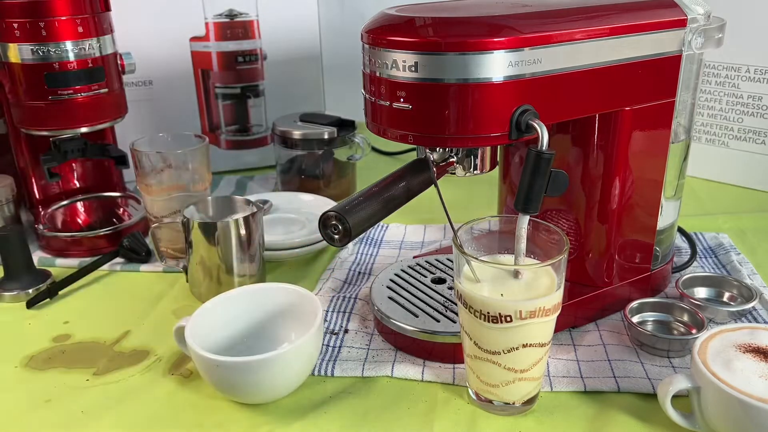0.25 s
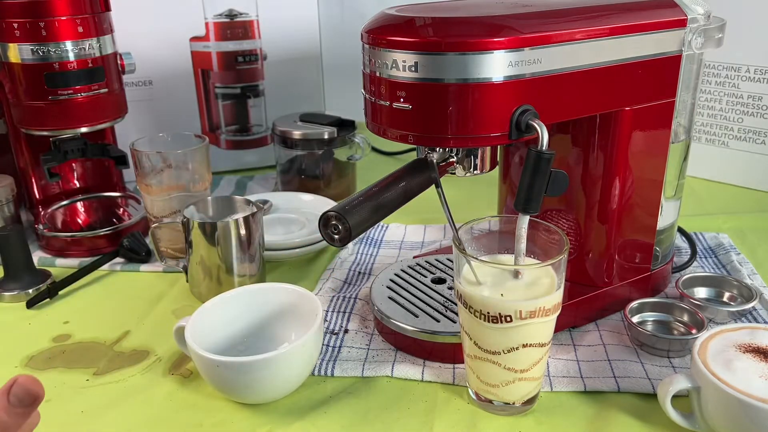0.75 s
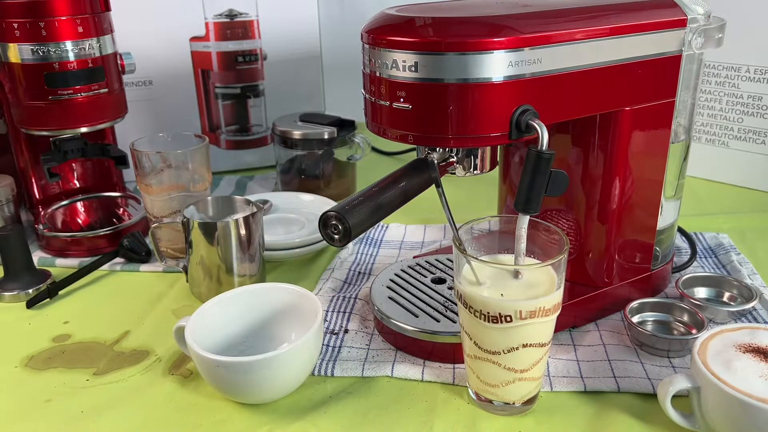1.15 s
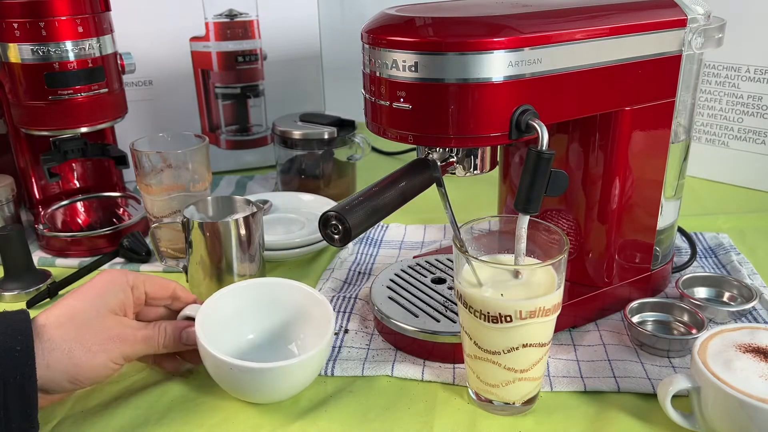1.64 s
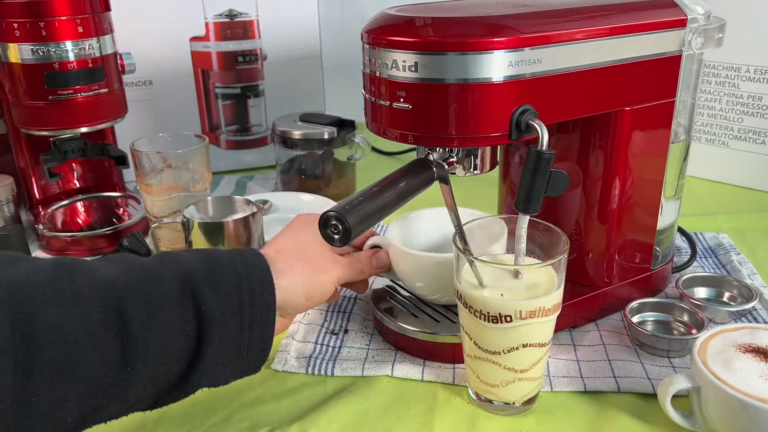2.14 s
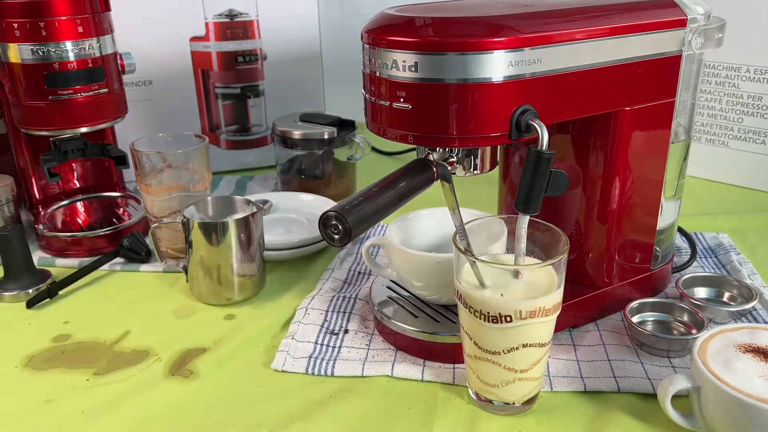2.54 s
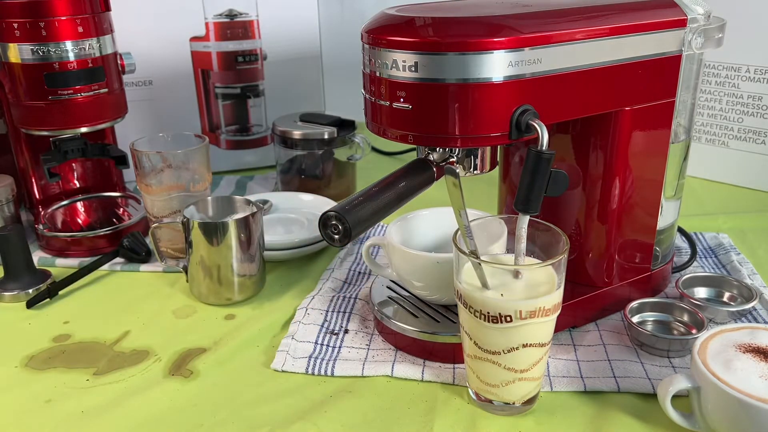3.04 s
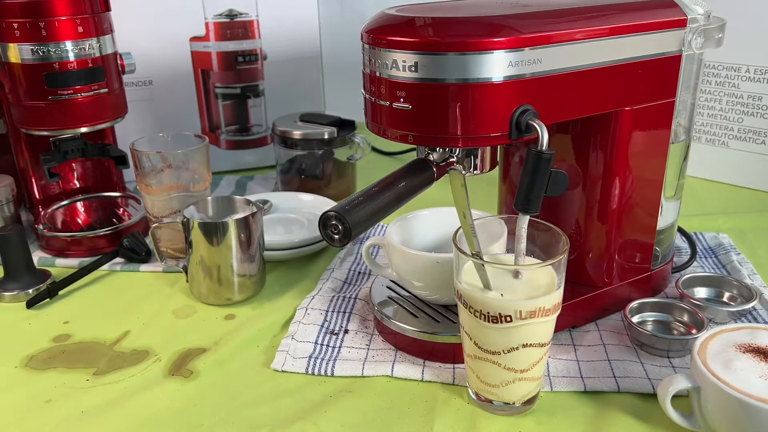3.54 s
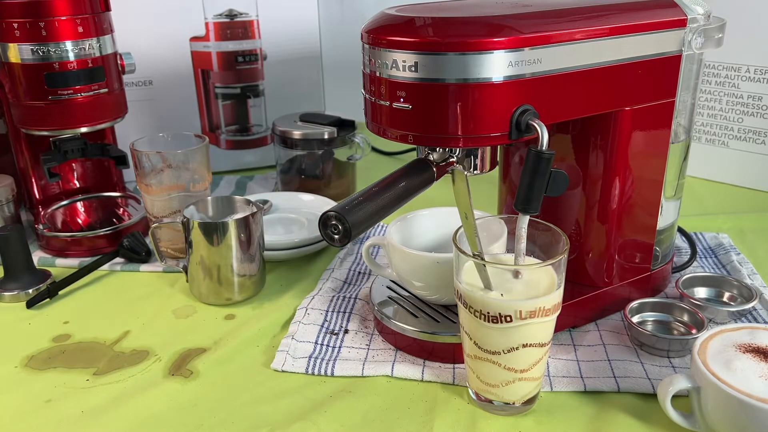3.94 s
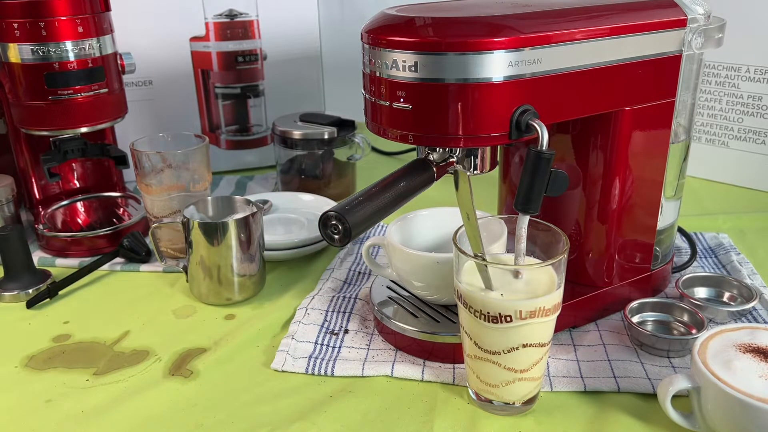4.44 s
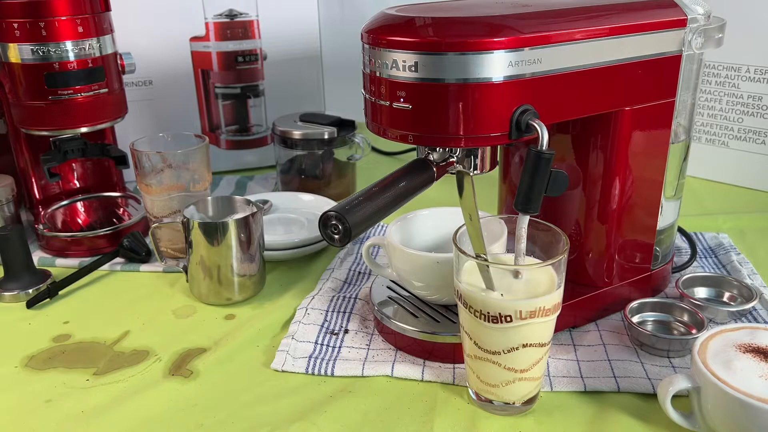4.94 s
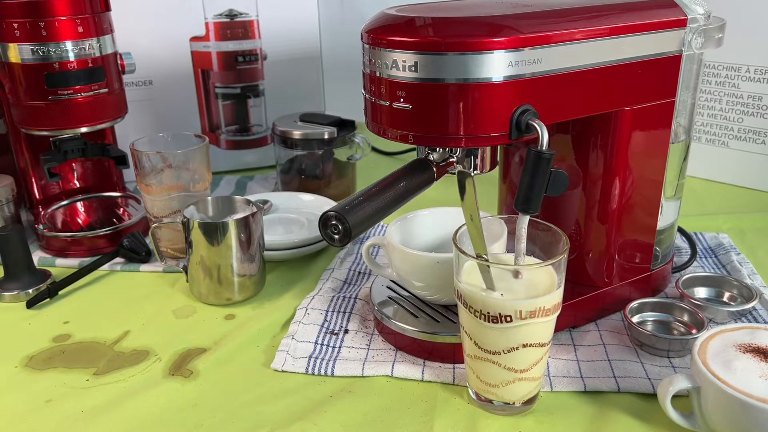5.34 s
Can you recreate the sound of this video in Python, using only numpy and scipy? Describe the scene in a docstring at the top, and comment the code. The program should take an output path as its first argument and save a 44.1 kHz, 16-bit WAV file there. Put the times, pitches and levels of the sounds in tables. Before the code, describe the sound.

From 0 to about 5.5 seconds a steam wand blows into a glass of milk, close up, in loud unbroken hiss. It is not plain white noise: narrow resonances around 2 to 4 kHz give it a piercing, glassy, whistling ring, with softer airy fizz above and faint churning rumble below. As foam rises, most of the resonances slide down by a few percent and the balance shifts gradually; the level grows by only a decibel or two, with slight fluttering. The fizz builds over the first second or so, then dulls. Around 2.1 seconds the hiss turns briefly brighter and a little softer for under half a second. Throughout, a small pump thumps about 4.4 times a second, nearly even, with short woody, low-mid knocks and a faint rattle, slightly left. Short kitchen echoes surround everything; the sound ends still running.

```python
"""Steam hisses and rings in a tall glass of milk on a kitchen counter, close to a stereo microphone.
The jet is noise shaped by resonances of the glass, the foam and the air above it; most sink as foam rises.
A small pump thumps in the machine's housing, timed by the mains, long and short gaps in turn: each stroke
rings decaying sines and shakes a noise rattle. Sparse decaying echoes add the room."""
import sys
import numpy as np
from scipy import signal
from scipy.io import wavfile
from scipy.ndimage import uniform_filter1d

SR = 44100
rng = np.random.default_rng(int(sys.argv[2]) if len(sys.argv) > 2 else 0)


def bounce(signal):
    """Save signal as a 16-bit WAV file at the path given by the first command-line argument."""
    frames = np.transpose(np.atleast_2d(signal))
    limited = np.clip(frames, -1, 1)
    pcm = np.round(limited * 32767).astype(np.int16)
    wavfile.write(sys.argv[1], SR, pcm)


N = 246078  # samples
FFT, HOP = 2048, 512  # samples per spectrum and from one to the next


def gain_of(db):
    """Decibels to a factor."""
    return 10 ** (np.asarray(db) / 20)


def evened(x):
    """Scales to rms 1."""
    return x / np.sqrt(np.mean(x ** 2) + 1e-20)


def smoothed(x, first, second, axis=-1, second_axis=-1):
    """Two running means, then rms 1: a slow random drift when fed with noise."""
    once = uniform_filter1d(x, size=first, axis=axis)
    return evened(uniform_filter1d(once, size=second, axis=second_axis))


def read(points, hz):
    """Reads a spectrum on a log-frequency axis."""
    f, value = np.transpose(points)
    return np.interp(np.log(hz + 1), np.log(f + 1), value)


def kitchen(x, t60_s=0.18, low_hz=500):
    """Room echoes: random-sign taps, about one in 20 samples, die away; each ear has its own, with no bass."""
    length = SR // 2
    taps = np.zeros((2, length))
    slots = np.arange(100, length - 20, 20)
    at = slots + rng.integers(0, 20, (2, len(slots)))
    np.put_along_axis(taps, at, rng.choice([-1., 1.], at.shape), axis=1)
    taps *= gain_of(-60 * np.arange(length) / SR / t60_s)
    taps /= np.linalg.norm(taps[0])
    bass_cut = signal.butter(4, low_hz, "high", fs=SR, output="sos")
    taps = signal.sosfilt(bass_cut, taps)
    return signal.fftconvolve(x, taps, axes=1)[:, :N]


def pump(uneven_db=.4):
    """Strokes ring the same housing modes at slightly uneven strength, and shake loose parts as band noise."""
    # Housing and counter under a stroke, before the stereo gain. Each row: frequency in Hz, level in dB,
    # t60 in s, rise time constant in s, first swing up or down (+1 or -1).
    housing_modes = [(85.6, -41, 0.16, 0.017, 1), (124, -64, 0.24, 0.0044, 1), (152, -66, 0.6, .004, -1),
                     (195.7, -33.5, 0.08, 0.0041, -1), (237, -34.5, 0.02, 0.0024, -1),
                     (266.3, -45.5, 0.28, 0.0077, 1), (378.7, -35, 0.067, 0.0041, -1),
                     (458.5, -41.5, 0.086, 0.0075, -1), (644, -35.5, 0.026, 0.0029, -1),
                     (820, -35.5, 0.023, 0.0013, -1), (1040, -42.5, 0.061, 0.0021, 1),
                     (1470, -39.5, 0.045, 0.0022, -1)]
    first_stroke_s, mains_hz = -0.016, 49.97
    gap_cycles = (11.5, 11)  # mains cycles between strokes, in turn
    rattle_hz, rattle_db, rattle_rise_s, rattle_t60_s = (180, 557), -51, 0.0049, 0.2

    t = np.arange(SR // 4) / SR
    thump = np.zeros(len(t))
    for hz, db, t60_s, rise_s, way in housing_modes:
        envelope = gain_of(db - 60 * t / t60_s) * (1 - np.exp(-t / rise_s))
        thump += np.sign(way) * envelope * np.sin(2 * np.pi * hz * t)

    times = first_stroke_s + np.cumsum(np.r_[0, np.resize(gap_cycles, 24)]) / mains_hz
    strokes = np.zeros(N + SR)  # starts one second early, so a stroke before zero still rings
    strokes[np.round((times + 1) * SR).astype(int)] = gain_of(uneven_db * rng.standard_normal(len(times)))

    shake = gain_of(rattle_db - 60 * t / rattle_t60_s) * (1 - np.exp(-t / rattle_rise_s))
    rattle_band = signal.butter(2, rattle_hz, "band", fs=SR, output="sos")
    loose = evened(signal.sosfilt(rattle_band, rng.standard_normal(N)))
    thumps = signal.oaconvolve(strokes, thump)[SR:SR + N]
    return thumps + loose * signal.oaconvolve(strokes, shake)[SR:SR + N]


def jet_course(t):
    """Jet level in dB, foam risen (0-1) and extra treble fizz in dB at the times t."""
    jet_db, swell_db_per_s = -24.5, 0.3132  # the jet grows slowly louder
    foam_start, foam_per_s = 0.097, 0.16  # the foam climbs steadily
    fizz_build_db, fizz_rise_s, fizz_sag_db_per_s = 4, 1.3, 1.05  # builds up, then the foam dulls it
    # hand and cup pass the glass: brighter, a little softer
    hand_s, hand_length_s, hand_fizz_db, hand_level_db = 2.08, .2, 8, -2.8

    hand = np.exp(-((t - hand_s) / hand_length_s) ** 2)
    level_db = jet_db + swell_db_per_s * t + hand_level_db * hand
    foam = foam_start + foam_per_s * t
    fizz_db = fizz_build_db * (1 - np.exp(-t / fizz_rise_s)) - fizz_sag_db_per_s * t
    return level_db, foam, fizz_db + hand_fizz_db * hand


def echoes_db(hz, foam):
    """Near echoes color the jet: fixed bumps per ear, and a ripple that turns into another as the foam rises."""
    # Ridges and notches that stay put, likely echoes off counter and housing.
    # Each row: frequency in Hz, width in Hz, level in dB, left minus right in dB.
    counter_echoes = [(990, 185, -1, -7), (1111, 50, -4.5, 12), (1260, 203, 10.5, 10.5),
                      (1400, 163, -17, -4), (2429, 93, -15.5, 1), (2560, 230, -5.5, 8), (3142, 41, 5, 6.5),
                      (3970, 50, 2, -17), (4330, 35, -13, -14), (4560, 66, -1.5, -1), (4880, 53, -6.5, -1),
                      (5118, 160, -15.5, 4), (8900, 174, 4, -1.5), (9260, 93, -11.5, -4),
                      (14700, 230, -11, -1)]
    # Fine color from many small echoes. Each row: frequency in Hz, spread in dB.
    ripple_spread = [(2500, .5), (6000, 1.5), (12000, 2.5)]

    at_hz, width, db, pan_db = np.transpose(counter_echoes)
    bumps = 1 / (1 + ((hz[:, None] - at_hz) / (width / 2)) ** 2)
    fixed_db = np.array([bumps @ (db + pan_db / 2), bumps @ (db - pan_db / 2)])

    grain = evened(uniform_filter1d(rng.standard_normal((2, len(hz))), size=5))
    low, high = grain * read(ripple_spread, hz)
    ripple_db = np.outer(low, np.cos(np.pi * foam)) + np.outer(high, np.sin(np.pi * foam))
    return fixed_db[:, :, None] + ripple_db


def hollows_db(hz, foam):
    """Hollows where neighboring rings cancel slide with the foam; some turn into ridges or back."""
    # Each row: frequency at low foam in Hz, sinking in %, width in Hz, low-foam dB, high-foam dB.
    hollows = [(2818, 6.6, 288, -10.5, -11.5), (7420, 4, 150, -7, 2), (8520, 5.6, 190, -12, 3),
               (11800, 3, 220, 2, -8)]
    total_db = 0
    for low_hz, sink, width, low_db, high_db in hollows:
        off = (hz[:, None] - low_hz * (1 - sink / 100 * foam)) / (width / 2)
        total_db = total_db + (low_db + (high_db - low_db) * foam) / (1 + off ** 2)
    return total_db


def rings(hz, foam, rumble_lift_db=1.0):
    """Power per ear, bin and frame: steep resonances slide with the foam over a rumble that it lifts a little."""
    # Rings of glass and foam. Each row: frequency at low foam in Hz, sinking in % (negative climbs),
    # width in Hz, low-foam dB, high-foam dB, left minus right in dB.
    glass_rings = [(1180, 9, 118, -16.5, -19, -4), (1426, -1, 126, -21, -20, 4),
                   (1772, -1, 70, -31, -20, -14), (2222.5, 8, 88, 3.5, 1.5, -1),
                   (2407, 0, 256, 0.5, -9.5, 0.5), (3267, 8, 273, -2.5, 2, -4.5),
                   (3484, 7.5, 69, -3.5, 3.5, 2), (3720, 6, 266, -1.5, -2.5, -1.5),
                   (4187, 3, 460, -9, -3, 6.5), (4497, 3, 394, -7, -9, 0.5), (5060, 5.5, 430, -3, -14, 0.5),
                   (5434, 5.5, 250, -11.5, -5, -2.5), (5890, 4, 470, -15, -22.5, 4),
                   (6500, 9, 320, -13, -15, -5), (6920, 4, 620, -15, -10.5, 4),
                   (7976, 7, 820, -15, -13, -0.5), (9604, 6, 1050, -16, -18.5, 8),
                   (10314, 2.5, 275, -18.5, -6.5, -6), (10990, 5, 840, -12, -10.5, 5.5),
                   (12650, 1.5, 810, -12, -13.5, 6.5), (14000, 2.5, 810, -14.5, -11.5, 5),
                   (14970, -0.2, 440, -10, -22, 3)]
    # Churning milk and room air. Each row: frequency in Hz, level in dB beside the rings.
    rumble = [(18, -90), (35, -60), (67, -45), (97, -30.5), (221, -36.5), (358, -34.5), (560, -40),
              (870, -29.5), (1100, -27.5), (1700, -40)]
    # Side of the rumble. Each row: frequency in Hz, left minus right in dB.
    rumble_pan = [(60, .5), (330, 0), (500, 5), (770, 0), (1200, -7.5)]

    # twice the dB makes power; the pan is shared half and half by the ears
    rumble_power = gain_of(2 * read(rumble, hz) + np.outer([1, -1], read(rumble_pan, hz)))
    power = rumble_power[:, :, None] * gain_of(2 * rumble_lift_db * foam)
    for low_hz, sink, width, low_db, high_db, pan_db in glass_rings:
        off = (hz[:, None] - low_hz * (1 - sink / 100 * foam)) / (width / 2)
        ring = gain_of(2 * (low_db + (high_db - low_db) * foam)) / (1 + off ** 2) ** 2
        power += gain_of([pan_db, -pan_db])[:, None, None] * ring
    return power


def steam(patchy_db=1.3, flutter_db=0.42):
    """Turbulent jet: random short-time spectra under the rings, with drifting patches and a level flutter."""
    # Each row: frequency in Hz, left-right likeness (0-1).
    likeness = [(60, 0.95), (330, 1), (700, 1), (1170, 0.68), (2500, 1), (4300, 0.98), (6900, 0.79),
                (10500, 0.85), (13000, 0.49)]
    # How far the fizz lifts each band. Each row: frequency in Hz, share (0-1).
    fizz_share = [(4500, 0.29), (11000, 0.67)]
    # Near echoes turn the right ear's phase from band to band. Each row: frequency in Hz, spread in radians.
    phase_spread = [(350, 0.16), (900, 0.44), (2500, 0.46), (5300, 0.07), (8500, 0.1), (13000, 0.7)]

    frames, hz = N // HOP + 5, np.fft.rfftfreq(FFT, 1 / SR)
    _, foam, fizz_db = jet_course(np.arange(frames) * HOP / SR)
    a, b, c, d, grain = rng.standard_normal((frames, len(hz), 5)).T
    patches = smoothed(grain, 10, 30, axis=0, second_axis=1)  # over bins, then frames

    same = np.clip(read(likeness, hz), -1, 1)[:, None]
    left = a + 1j * b
    right = same * left + np.sqrt(1 - same ** 2) * (c + 1j * d)
    lag = smoothed(rng.standard_normal(len(hz)), 9, 9)
    right *= np.exp(1j * read(phase_spread, hz) * lag)[:, None]

    color_db = echoes_db(hz, foam) + hollows_db(hz, foam)
    color_db = color_db + np.outer(read(fizz_share, hz), fizz_db) + patchy_db * patches
    spectra = np.array([left, right]) * np.sqrt(rings(hz, foam)) * gain_of(color_db)
    hiss = signal.istft(spectra, nperseg=FFT, noverlap=FFT - HOP)[1][:, :N]

    flutter = smoothed(rng.standard_normal(N), 900, 900)
    level_db = jet_course(np.arange(N) / SR)[0]
    return evened(hiss) * gain_of(level_db + flutter_db * flutter)


def scene():
    """Jet and pump, each with some room."""
    hiss = steam()
    thumps = pump() * gain_of([[.3], [-.3]])  # slightly to the left
    to_room = gain_of(-8) * hiss + gain_of(-1.5) * thumps
    return hiss + thumps + kitchen(to_room)


def record(dry, low_hz=50, edge_hz=15760):
    """The microphone drops the deep bass; then a steep filter cuts the highest treble."""
    bass_cut = signal.butter(3, low_hz, "high", fs=SR, output="sos")
    thin = signal.sosfilt(bass_cut, dry)
    band_limit = signal.firwin(2047, edge_hz, window=("kaiser", 9), fs=SR)
    return signal.oaconvolve(thin, band_limit[None], "same")


dry = scene()
out = record(dry)
bounce(out)
```